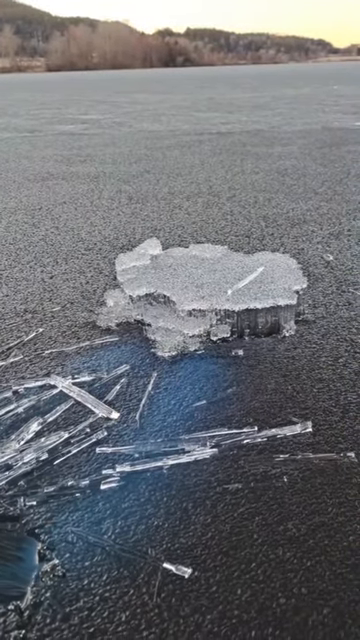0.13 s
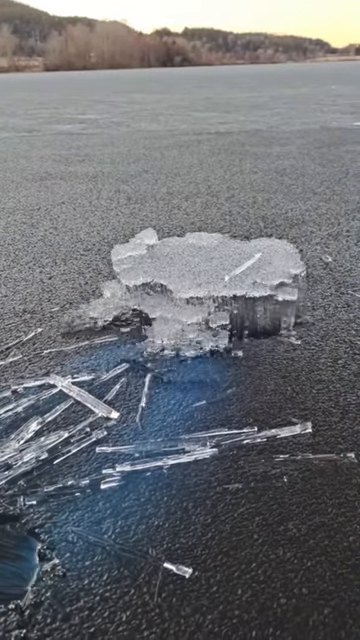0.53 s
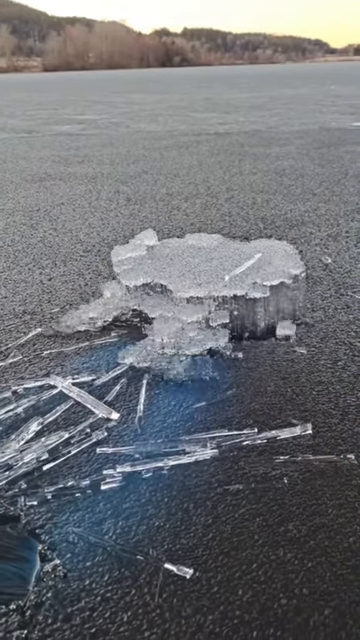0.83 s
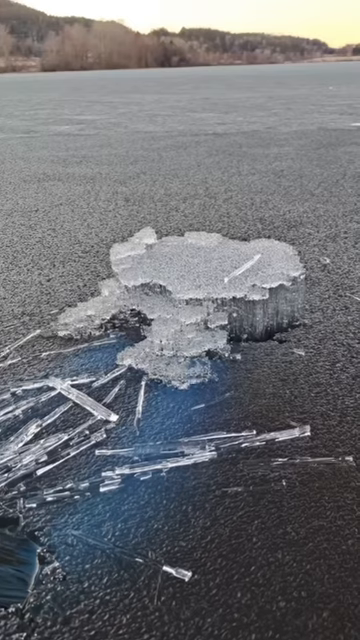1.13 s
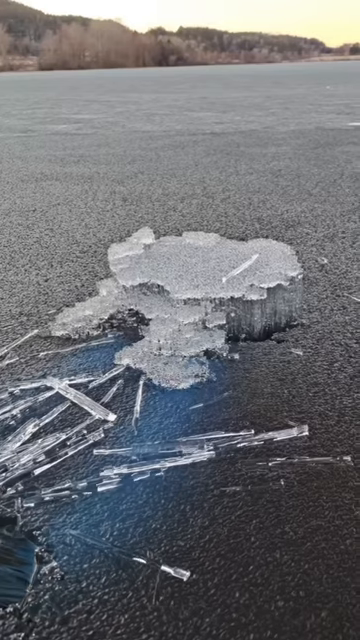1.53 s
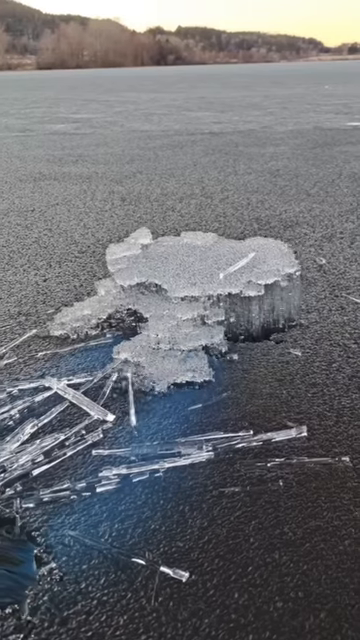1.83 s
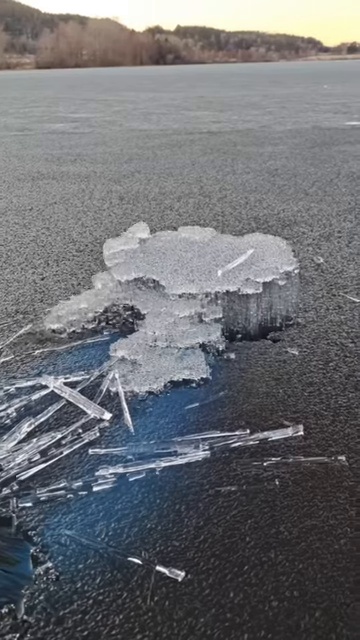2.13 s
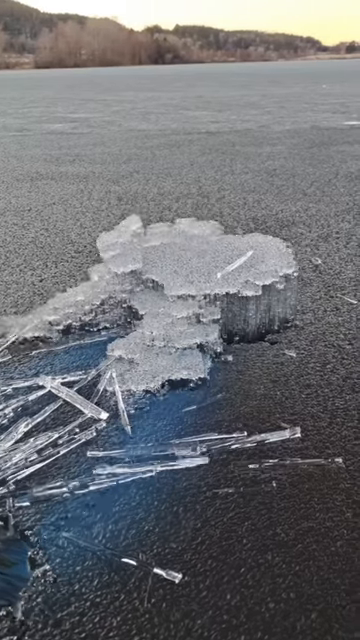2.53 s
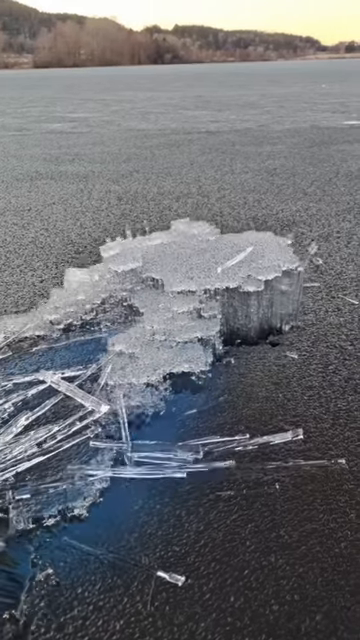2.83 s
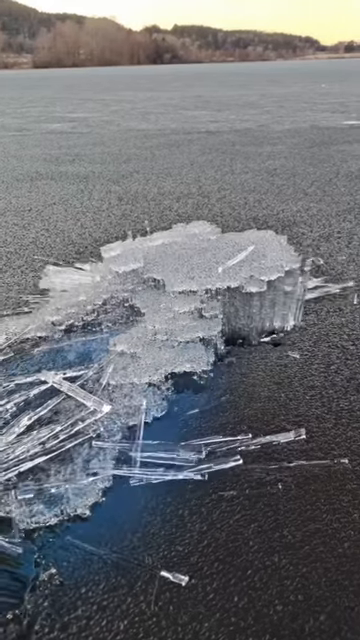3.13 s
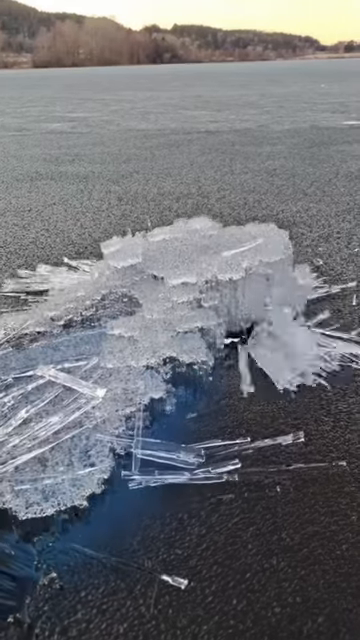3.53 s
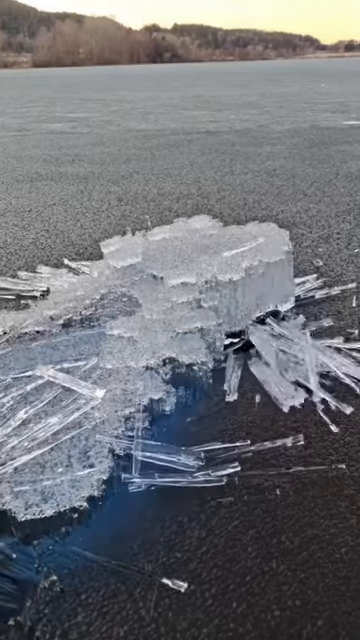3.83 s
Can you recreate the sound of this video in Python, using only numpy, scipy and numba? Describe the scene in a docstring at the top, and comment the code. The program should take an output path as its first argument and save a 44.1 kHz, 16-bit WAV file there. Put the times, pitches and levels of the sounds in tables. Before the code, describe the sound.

Candle ice needles crumble and slide with glassy, tinkling crackle, building to a bright crash over faint rumble.

```python
"""Frozen lake: a block of candle ice falls apart near a phone with two microphone ports.
Tens of thousands of needles slide, tick and ring: each is one struck, swelling and decaying mode.
Clumps snap off as short bursts of the same needles.
Wind and the far shore rumble underneath as noise in flickering bands, with three faint wavering tones.
"""
import sys
import numpy as np
from scipy import signal
from scipy.fft import rfft, irfft
from scipy.io import wavfile
from scipy.ndimage import uniform_filter1d, map_coordinates
from numba import njit

SR = 44100
rng = np.random.default_rng(int(sys.argv[2]) if len(sys.argv) > 2 else 0)


def volts(x):
    """Linear amplitude factor 10**(x/20) for a level x in dB, scalar or array-like."""
    e = np.asarray(x, float) / 20
    return 10 ** e


def inscribe(sig):
    """Save sig as 16-bit PCM at rate SR to the path in sys.argv[1].

    A 1-D sig is mono; a 2-D sig holds one channel per row.
    Samples are clipped to [-1, 1] before scaling.
    """
    pcm = np.round(np.clip(np.atleast_2d(sig).T, -1, 1) * 32767)
    wavfile.write(sys.argv[1], SR, pcm.astype(np.int16))


N = 176400

# Course of the slide: t/s, relative level/dB, extra weight of thick low needles/dB, left re right/dB
SLIDE_COURSE = [(0.0, -64, 7, -10), (0.13, -78.5, 0, -4), (0.33, -65, -9, 0), (0.385, -45, 4, -3.5),
                (0.43, -39, 3, -1.5), (0.54, -33.5, 1.5, -2.5), (0.58, -41, 0, -3), (0.66, -41, 1.5, -4),
                (0.75, -47, -0.5, -2.0), (0.81, -43, 0.5, -1.5), (0.88, -43.5, 0, -2), (0.9, -47.5, 2, -2),
                (0.97, -41, -5, -3.5), (1.06, -56.5, 6, -4), (1.18, -55, 3, -7.5), (1.46, -59, 4.5, -5),
                (1.64, -41, 2, -5.5), (1.71, -42.5, 4, -3), (1.92, -38, -3, -5.5), (1.99, -49, -7, -5),
                (2.1, -45.5, 3, -2), (2.16, -48, 6, -2.5), (2.23, -51, 1, -2), (2.26, -62, -3, -8),
                (2.33, -64.5, 2, -7), (2.39, -52, -5, -2), (2.43, -39, 4, -2.5), (2.47, -34, 8.5, -1),
                (2.62, -38.5, 4.5, -2), (2.74, -37.5, 3.5, -1), (2.81, -36, 5, -1.5),
                (2.85, -26.5, -4.5, 0.5), (2.88, -32.5, -5, -2), (2.92, -28.5, -10, -0.5),
                (2.98, -34.5, -5, -2), (3.03, -35, -4, -0.5), (3.09, -36.5, -7.5, -1.5), (3.17, -45, 6, -2),
                (3.25, -32.5, 10, -2), (3.32, -29.5, 1.5, -5), (3.35, -29.5, 3.5, -3.5),
                (3.44, -27, -3, -3), (3.48, -19, -6, -2), (3.52, -24.5, -13, -2.5),
                (3.64, -27.5, -10.5, -3.5), (3.685, -34.5, -3.5, -2.5), (3.79, -34, -5, -1),
                (3.84, -37.5, -8, -1), (3.885, -40, -1, -3), (3.95, -35, -11, -0.5), (4.0, -39, -5, -3)]
# Clumps snapping off: t/s, relative level/dB, clump f/Hz, burst time scale/s
CLUMP_SNAPS = [(0.429, -31, 5630, 0.011), (0.587, -33.5, 7390, 0.011), (0.688, -31.5, 9000, 0.011),
               (0.8023, -32, 11500, 0.016), (0.882, -34.5, 7650, 0.016), (0.923, -35, 12300, 0.013),
               (0.9566, -31, 7600, 0.0088), (0.976, -35, 2750, 0.0069), (1.151, -40.5, 5600, 0.024),
               (1.558, -37.5, 6440, 0.0091), (1.626, -36, 13300, 0.02), (1.787, -34, 7000, 0.013),
               (1.8313, -27.5, 7400, 0.021), (1.9403, -31, 12900, 0.0048), (2.173, -33.5, 4900, 0.017),
               (2.298, -50.5, 12600, 0.005), (2.585, -27.5, 7200, 0.0084), (2.835, -23, 7440, 0.019),
               (2.9015, -20, 12500, 0.029), (2.995, -26.5, 12800, 0.005), (3.015, -21, 11700, 0.014),
               (3.0554, -27.5, 12400, 0.01), (3.1183, -30.5, 4800, 0.0085), (3.4544, -15.5, 12300, 0.039),
               (3.479, -15.5, 7840, 0.015), (3.545, -20, 12600, 0.012), (3.6976, -24.5, 12500, 0.0082),
               (3.71, -21, 12000, 0.025), (3.8027, -21.5, 11800, 0.016), (3.901, -25, 11900, 0.01),
               (3.919, -29.5, 11150, 0.0045), (3.956, -28, 11700, 0.0076)]
# Colour of the sliding ice: f/Hz, relative level per Hz/dB
ICE_SPECTRUM = [(350, -46), (600, -19), (758, -20), (1110, -2), (1340, -38), (1510, -4.5), (2740, 0.5),
                (3850, -3), (4160, -1), (4500, 3), (6310, -1), (7370, 9.5), (8840, -8), (12600, 9.5),
                (13400, -3)]
# Stereo width shading: f/Hz, side gain/dB
SIDE_GAIN = [(100, -8), (400, 2.5), (1200, -7), (3000, 1.5), (6000, 0.5), (9000, -8), (13000, -7.5)]
# Colour of the rumble: f/Hz, relative level per Hz/dB
WIND_SPECTRUM = [(15, -43), (32, -17), (42, -3), (55, -4), (103, -4), (135, 3), (166, -3.5), (228, -4),
                 (274, -10), (312, -11.5), (338, -17), (375, -8), (460, -7), (565, -4), (630, -13.5),
                 (1130, -28), (1260, -39), (2490, -48), (3300, -65), (4440, -49.5), (12400, -56.5),
                 (13400, -66)]
# Course of the gusts: t/s, relative level/dB
GUST_COURSE = [(0.0, -47.5), (0.37, -50), (0.53, -43), (0.78, -51), (0.8, -47), (3.48, -45.5),
               (3.51, -48.5), (4.0, -48.5)]
# Width of the rumble: f/Hz, side re mid/dB
WIND_WIDTH = [(60, -4), (110, -53), (200, -10), (370, -12), (670, -1.5), (1230, 16.5), (2250, -1),
              (4120, -8), (7540, 15), (13800, -6)]
# Balance of the rumble: f/Hz, left re right/dB
WIND_BALANCE = [(60, -0.5), (110, 0), (200, -4), (370, 0.5), (670, -6.5), (1230, -4), (2250, 2.5),
                (4120, -18), (7540, -18), (13800, 41)]
# Hum tones before wavering: f/Hz, level/dB
HUM_TONES = [(45.7, -56.5), (91.3, -59.5), (135, -57)]

MAX_SCATTER_STEPS = 3  # largest needle, in steps of the size scatter
SWELL_SHARE = 0.3  # swell time constant over decay time constant
MOTTLE_DB, MOTTLE_HZ, MOTTLE_S = 4, 120, 0.04  # depth and grid spacing of the mottle
THICK_HZ = 2920  # needles under this pitch count as thick
LOW_HZ, TOP_HZ = 500, 13600  # pitch range of the needles
LAG_S, LAG_SPREAD_S, PAN_SPREAD_DB = -0.00014, 0.00011, 4.5  # left re right, needle by needle


def read(table, x, col=1):
    """Straight lines between the rows of a table."""
    rows = np.array(table)
    return np.interp(x, rows[:, 0], rows[:, col])


def read_hz(table, hz):
    """Straight lines in dB over log frequency."""
    rows = np.array(table)
    return np.interp(np.log(np.maximum(hz, 1)), np.log(rows[:, 0]), rows[:, 1])


def colour(x, table):
    """Zero-phase filter through f/Hz, gain/dB points."""
    hz = np.arange(N // 2 + 1) * SR / N
    return irfft(rfft(x) * volts(read_hz(table, hz)), N)


def walk(rate_hz):
    """Random levels held for 1 / rate_hz and smoothed twice; spread near 1."""
    hold = int(SR / rate_hz)
    steps = np.repeat(rng.standard_normal(N // hold + 1), hold)
    smooth = uniform_filter1d(uniform_filter1d(steps, hold), hold)
    return 1.263 * smooth[:N]


def wind():
    """Rumble: noise in overlapping octave bands that share the gusts and flicker separately."""
    hz = np.arange(N // 2 + 1) * SR / N
    mid = rfft(colour(rng.standard_normal(N), WIND_SPECTRUM))
    side = rfft(colour(rng.standard_normal(N), WIND_SPECTRUM)) * volts(read_hz(WIND_WIDTH, hz))
    balance_db = read_hz(WIND_BALANCE, hz) * np.array([[0.5], [-0.5]])
    pair = np.array([mid + side, mid - side]) * volts(balance_db)
    out = 0
    for octave in range(4, 15):  # centres 2 ** octave Hz
        distance = np.clip(np.log2(np.maximum(hz, 1)) - octave, -1, 1)
        band = np.cos(np.pi / 2 * distance) ** 2
        out = out + volts(2.8 * walk(7.025)) * irfft(pair * band, N)
    gust_db = read(GUST_COURSE, np.arange(N) / SR) + 0.5
    return out / np.std(out) * volts(gust_db)


def hum():
    """Three low sines sharing one pitch drift, each wavering in strength."""
    drift = 1 + 0.0165 * walk(2.595)
    out = 0
    for hz, db in HUM_TONES:
        phase = 2 * np.pi * np.cumsum(hz * drift) / SR
        out = out + volts(db + 3.7 * walk(5.9)) * np.sin(phase)
    return out


@njit
def ring(start_s, hz, cycles, size, swell_share, n):
    """One mode per needle: swells briefly, decaying at 60 dB per given number of cycles."""
    out = np.zeros(n)
    for g in range(len(hz)):
        decay_per_s = np.log(1000) * hz[g] / cycles[g]
        w = (2j * np.pi * hz[g] - decay_per_s) / SR
        first = int(np.ceil(start_s[g] * SR))
        z = size[g] * np.exp(w * (first - start_s[g] * SR))  # start between samples
        turn = np.exp(w)
        unrisen, fade = 1., np.exp(-decay_per_s / swell_share / SR)
        # stop after five decay time constants
        for k in range(max(first, 0), min(n, first + int(5 * SR / decay_per_s))):
            out[k] += z.imag * (1 - unrisen)
            unrisen *= fade
            z *= turn
    return out


def needles(t_s, hz, db, cycles, scatter_db):
    """Struck needles, each with its own size, sign, lag and balance between the ports."""
    count = len(t_s)
    scatter = np.minimum(rng.exponential(size=count), MAX_SCATTER_STEPS)
    size = volts(db + scatter_db * scatter) * rng.choice([-1., 1.], count)
    lag_s = LAG_S + LAG_SPREAD_S * rng.standard_normal(count)
    pan_db = read(SLIDE_COURSE, t_s, col=3) + PAN_SPREAD_DB * rng.standard_normal(count)
    cycles = np.full(count, float(cycles))
    left = ring(t_s + lag_s / 2, hz, cycles, size * volts(pan_db / 2), SWELL_SHARE, N)
    right = ring(t_s - lag_s / 2, hz, cycles, size * volts(-pan_db / 2), SWELL_SHARE, N)
    return np.array([left, right])


def swarm(db, cycles, scatter_db, patchy_db, count):
    """Needles at random times and log-spread pitches, ice-coloured, with patchy level."""
    place = rng.random(count)
    t_s = place * N / SR
    hz = LOW_HZ * (TOP_HZ / LOW_HZ) ** rng.random(count)
    # 20 log10 offsets the sparser high needles per Hz
    ice_db = read_hz(ICE_SPECTRUM, hz) + 20 * np.log10(hz / TOP_HZ)
    thick_db = read(SLIDE_COURSE, t_s, col=2) / (1 + (hz / THICK_HZ) ** 4)
    patch_db = patchy_db * walk(45)[(place * N).astype(int)]
    level_db = db + ice_db + thick_db + patch_db + read(SLIDE_COURSE, t_s)
    return needles(t_s, hz, level_db, cycles, scatter_db)


def slide():
    """Fine crackle of rubbing needles plus the sparser, longer tinkle of falling ones."""
    crackle = swarm(db=4.5, cycles=9.7, scatter_db=1.0, patchy_db=1.5, count=120000)
    tinkle = swarm(db=-9, cycles=380, scatter_db=2.5, patchy_db=1.0, count=16000)
    return crackle + tinkle


def mottle(x):
    """Mottle: random gain patches over pitch and time, partly unlike left and right."""
    hz, t_s, spectrum = signal.stft(x, SR, nperseg=512)
    fields = rng.standard_normal((3, 190, 120))
    at = np.meshgrid(hz / MOTTLE_HZ, t_s / MOTTLE_S, indexing="ij")
    both, left, right = (map_coordinates(field, at, order=1) for field in fields)
    gain = volts(MOTTLE_DB * (both + 0.53 * np.array([left, right])))
    return signal.istft(spectrum * gain, SR, nperseg=512)[1][:, :N]


def snaps(count=200):
    """Each clump sheds a burst of needles, 30 % near its own pitch, later ones weaker."""
    t_s, db, clump_hz, scale_s = np.repeat(np.array(CLUMP_SNAPS), count, axis=0).T
    order, choice, spread = rng.random((3, len(t_s)))
    late = 0.71 * np.sin(np.pi / 2 * order) ** 1.5 + 1.1 * order ** 4  # in burst time scales
    near_hz = clump_hz * (1 + 0.11 * (spread - 0.5))
    broad_hz = 3500 * (TOP_HZ / 3500) ** spread ** 0.5
    hz = np.minimum(np.where(choice < 0.3, near_hz, broad_hz), TOP_HZ)
    return needles(t_s + scale_s * late, hz, db - 11 - 5 * late, cycles=41.4, scatter_db=3)


def scene():
    """Ice, thinned in the bass, over wind and hum."""
    ice = colour(mottle(slide()) + snaps(), [(250, -38), (600, 0)])
    return wind() + hum() + ice


def band_limit(x):
    """A steep low-pass at the top of the band."""
    return signal.sosfilt(signal.butter(12, 13250, fs=SR, output="sos"), x)


def record(dry):
    """The phone shades the stereo width by pitch."""
    mid = (dry[0] + dry[1]) / 2
    side = colour((dry[0] - dry[1]) / 2, SIDE_GAIN)
    mix = np.array([mid + side, mid - side])
    return band_limit(mix)


dry = scene()
out = record(dry)
inscribe(out)
```